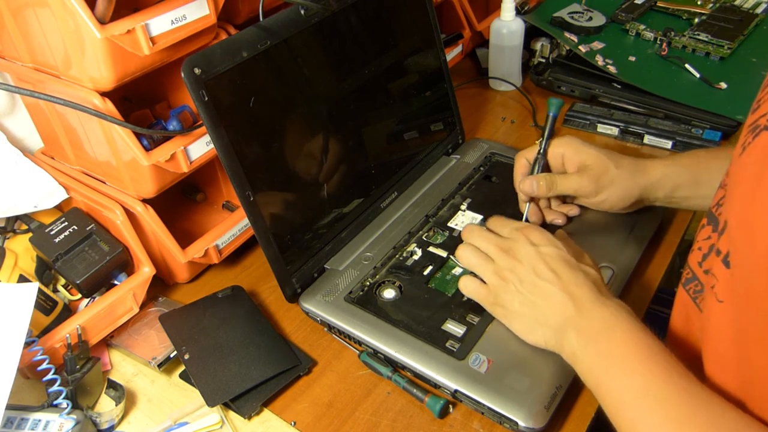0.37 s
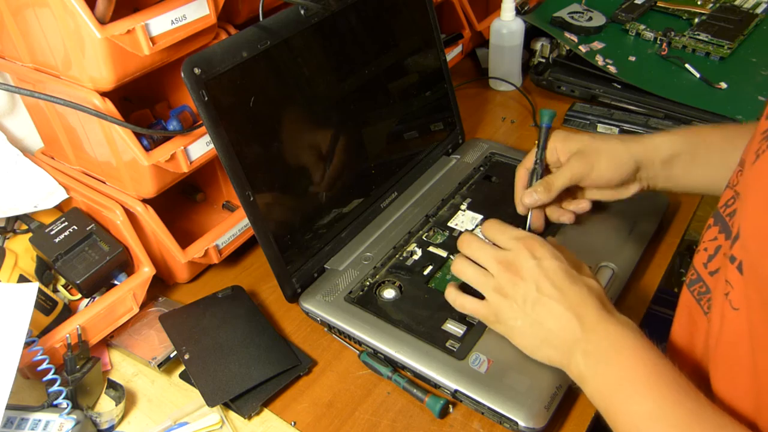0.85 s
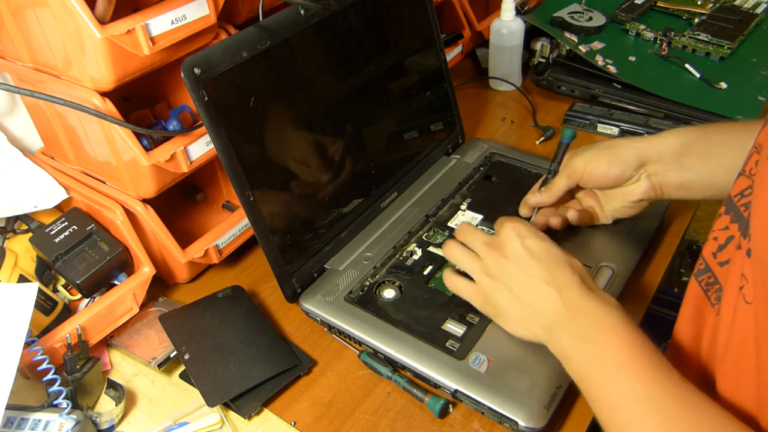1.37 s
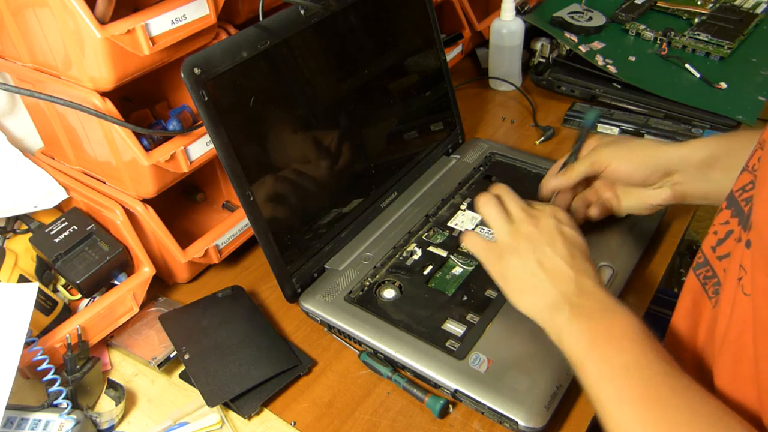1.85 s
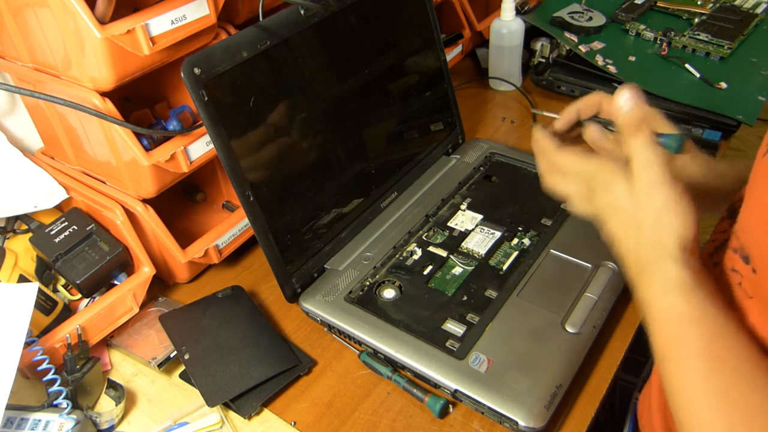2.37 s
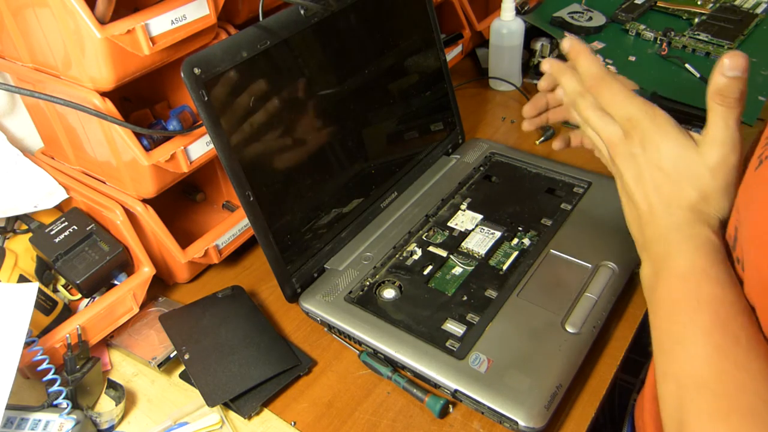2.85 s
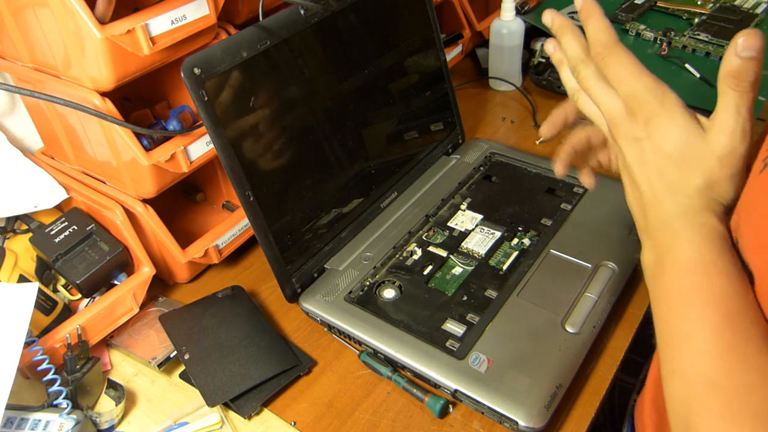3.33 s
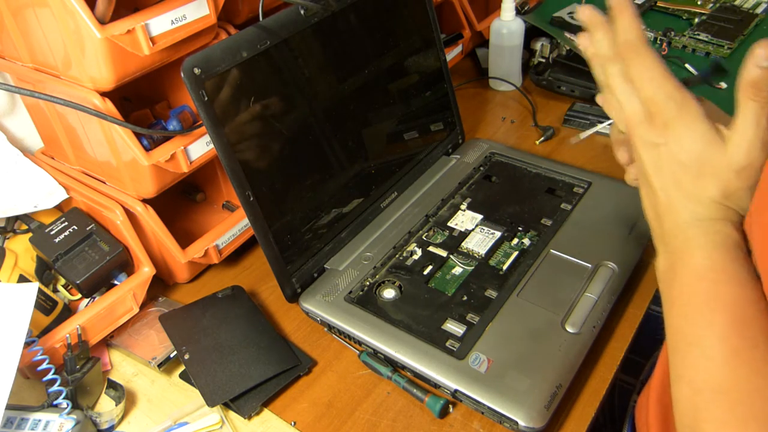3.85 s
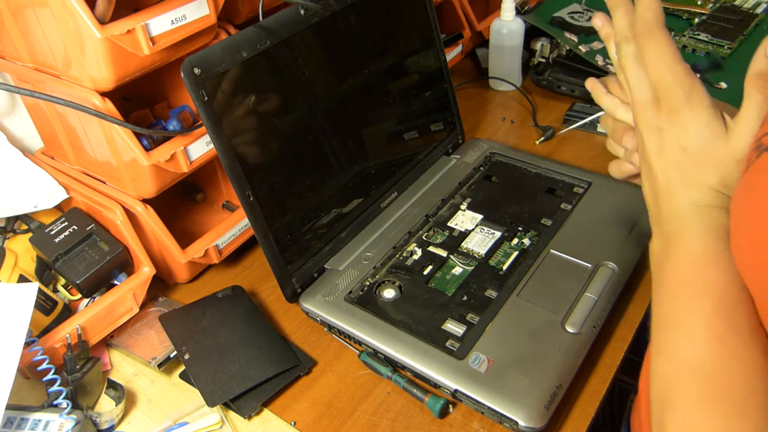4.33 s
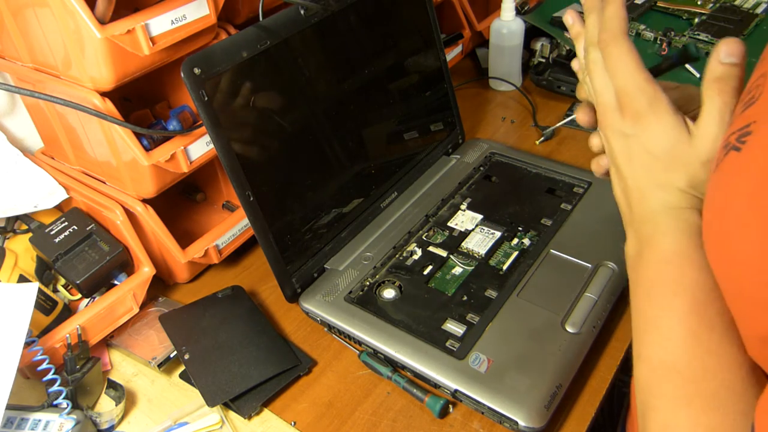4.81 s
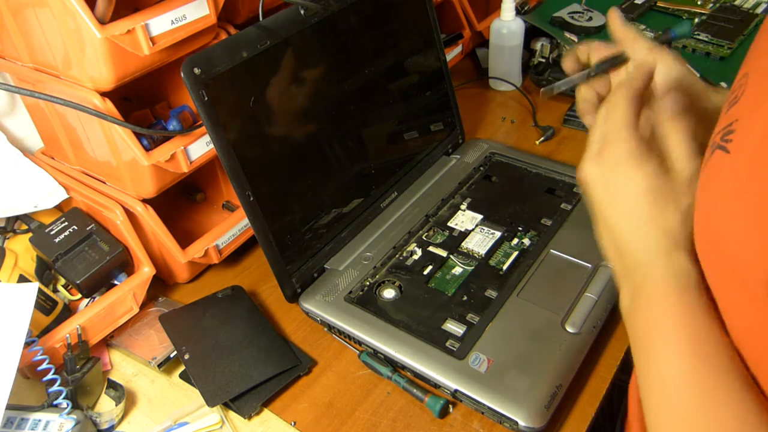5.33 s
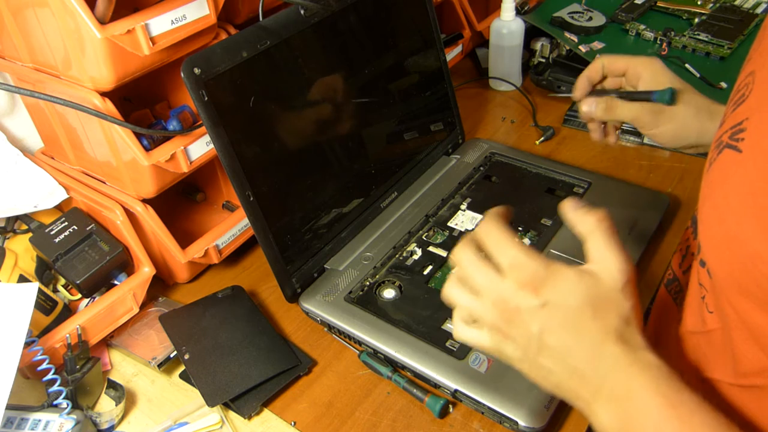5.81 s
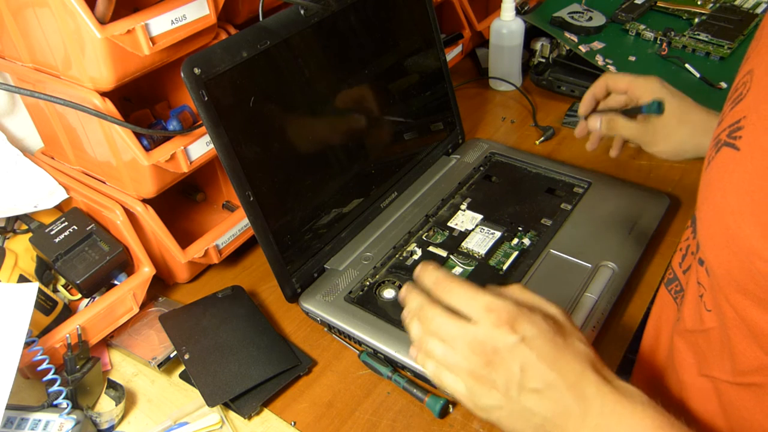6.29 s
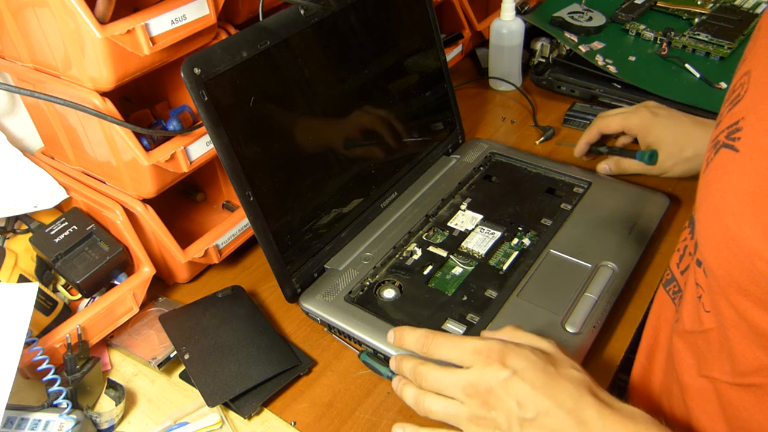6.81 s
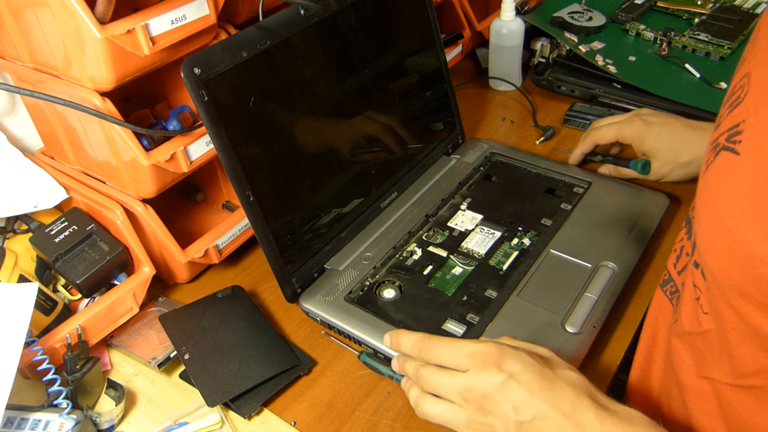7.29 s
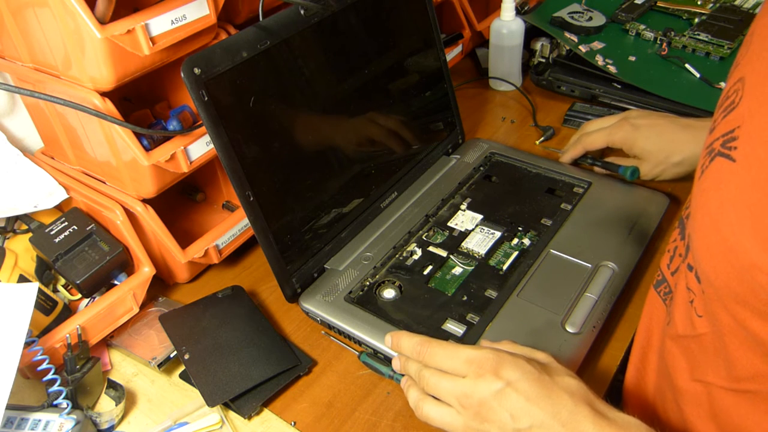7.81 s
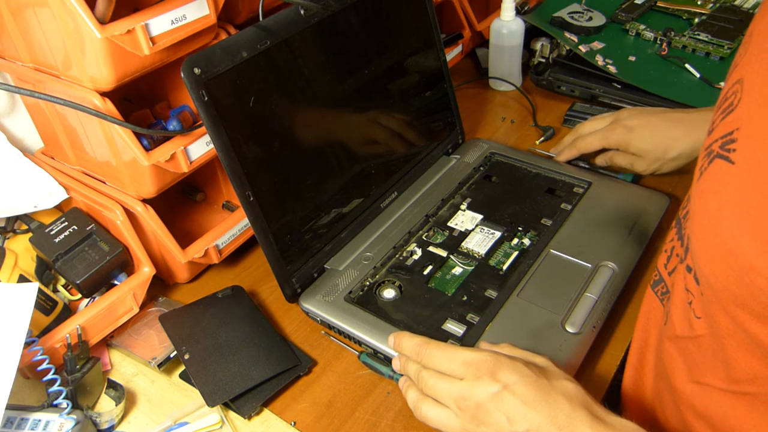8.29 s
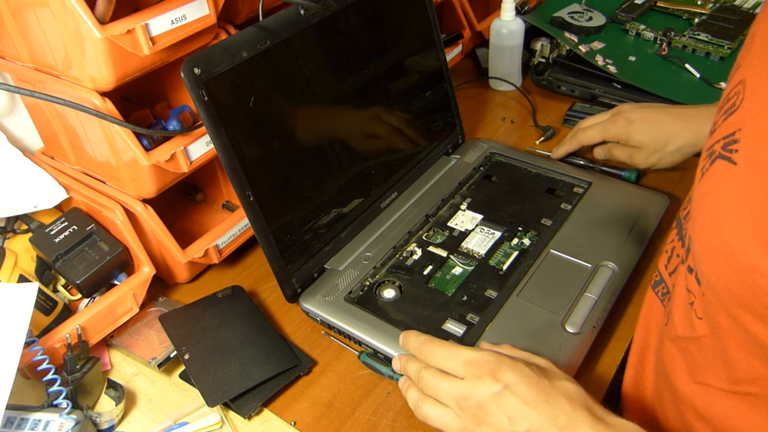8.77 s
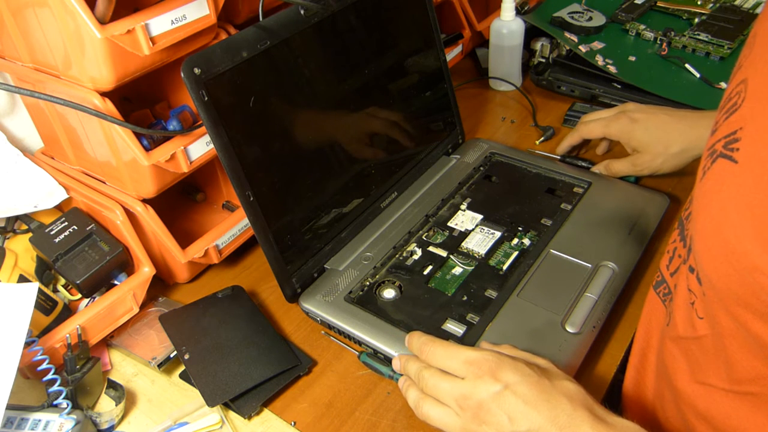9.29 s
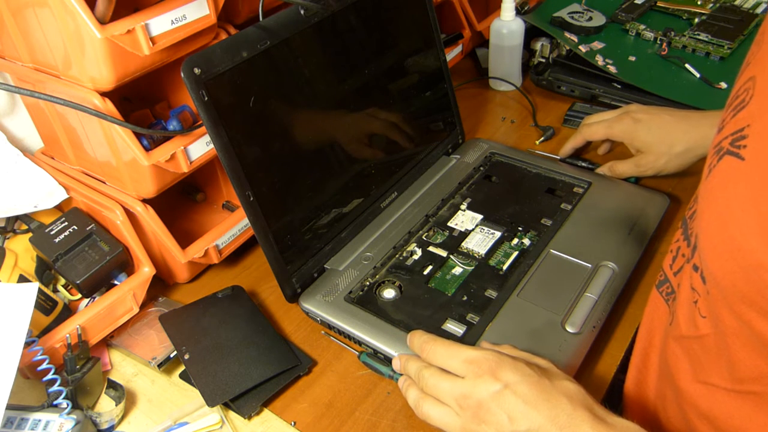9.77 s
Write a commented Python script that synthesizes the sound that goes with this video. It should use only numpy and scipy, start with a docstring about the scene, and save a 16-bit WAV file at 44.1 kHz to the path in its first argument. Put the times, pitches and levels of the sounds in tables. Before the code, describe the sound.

Small clacks, finger rubs and faint steel ticks of a screwdriver in an opened laptop, then one loud knock as the tool is put down.

```python
"""A quiet workshop: hands work with a small screwdriver in an opened laptop on a wooden bench.
Contacts and strong first echoes push damped resonances of small parts, plastic and hollow case; the bench rings.
Skin and sleeves are swelling noise; the steel shaft ticks and jingles. At last the tool is knocked down.
The wide stereo microphone hears the shop's echoes in noise bands, and adds hiss; the take is slightly off zero."""
import sys
import numpy as np
from scipy import signal
from scipy.fft import rfft, irfft, next_fast_len
from scipy.io import wavfile
from scipy.ndimage import uniform_filter1d

SR = 44100
rng = np.random.default_rng(int(sys.argv[2]) if len(sys.argv) > 2 else 0)


def dump(signal):
    """Clip the signal to [-1, 1] and save it as 16-bit WAV at the path in sys.argv[1]."""
    limited = np.clip(np.atleast_2d(signal).T, -1, 1)
    pcm = np.round(limited * 32767).astype(np.int16)
    wavfile.write(sys.argv[1], SR, pcm)


def how_loud(loudness_db):
    """Turn decibels into a plain amplitude multiplier (0 dB gives 1, 20 dB gives 10)."""
    steps = np.asarray(loudness_db, float) / 20
    return 10 ** steps


N = 436149   # samples

# resonances of the steel tool: centre_hz, width_hz (of one pass), level_db (relative)
TOOL_PEAKS = [(3900, 200, 1), (4170, 150, 3), (1900, 500, 0), (2300, 500, 0), (3050, 450, 0),
              (4850, 600, 0), (5450, 260, 0), (6100, 800, 0), (8400, 700, 0)]


def rms_one(x):
    """Scales a signal to an rms of one."""
    return x / np.sqrt(np.mean(x ** 2) + 1e-20)


def at_hz(points, hz):
    """Reads a curve of (Hz, value) points, straight over log frequency."""
    point_hz, value = np.transpose(points)
    return np.interp(np.log(hz), np.log(point_hz), value)


def pair(mid, side, alike):
    """Left and right from two unrelated signals with the given likeness (correlation)."""
    alike = np.clip(alike, -1, 1)
    common = np.sqrt(1 + alike) * mid
    apart = np.sqrt(1 - alike) * side
    return np.array([common + apart, common - apart]) / np.sqrt(2)


def coloured(spectrum, likeness):
    """Stereo noise with a spectrum and a likeness by frequency; rms 1."""
    size = next_fast_len(N)
    hz = np.maximum(np.arange(size // 2 + 1) * SR / size, 1)
    mid, side = rfft(rng.standard_normal((2, size)))
    tones = pair(mid, side, at_hz(likeness, hz)) * how_loud(at_hz(spectrum, hz))
    return rms_one(irfft(tones, size)[:, :N])


def swells(rows):
    """Each stroke swells to its peak and fades; their powers add."""
    edge_db, curve = -13.5, 1.37   # level at the end of swell and fade; 1 pointed, 2 round
    t = np.arange(0, N / SR + 0.002, 0.001)
    power = 0
    for s, peak_db, swell, fade in rows:
        away = np.where(t < s, (s - t) / swell, (t - s) / fade)
        power = power + how_loud(peak_db + edge_db * np.minimum(away, 8) ** curve) ** 2
    return np.interp(np.arange(N) / SR, t, np.sqrt(power))


def force(times, level_db, length_ms):
    """Rattling pushes that start at once and die, their energy levelled over all pitches."""
    out = np.full(N, 1e-18)   # a tiny floor keeps the filters out of denormal numbers
    t_ms = np.arange(4096) * 1000 / SR
    for s, gain, ms in zip(times, how_loud(level_db), np.clip(length_ms, 0.2, 30)):
        rattle = rng.standard_normal(4096)
        for _ in range(2):
            tones = rfft(rattle * np.exp(-t_ms / (1.49 * ms)))
            rattle = irfft(tones / np.abs(tones))   # level the spectrum, keep the timing
        push = rms_one(rattle * np.exp(-t_ms / (5.0 * ms))) / np.sqrt(4096)   # unit energy
        i = round(s * SR)
        out[i:i + 4096] += gain * push
    return out


def resound(push, peaks):
    """Heavily damped parts colour a push; each resonance acts twice for steep flanks."""
    out = 0
    for k, (hz, width_hz, level_db) in enumerate(peaks):
        r, w = np.exp(-np.pi * width_hz / SR), 2 * np.pi * hz / SR
        section = [(1 - r * r) / 2, 0, (r * r - 1) / 2, 1, -2 * r * np.cos(w), r * r]
        sign = (-1) ** k   # neighbours in opposite phase
        out = out + sign * how_loud(level_db) * signal.sosfilt([section, section], push)
    return out


def ring(push, mode):
    """A mode answers a push with a decaying sine."""
    hz, level_db, t60 = mode
    r, w = how_loud(-60 / (t60 * SR)), 2 * np.pi * hz / SR
    return signal.lfilter([0, how_loud(level_db) * np.sin(w)], [1, -2 * r * np.cos(w), r * r], push)


def background():
    """Steady stereo noise, the hiss of the microphone, shaped in level and likeness by frequency."""
    # spectrum: freq_hz, level_db (relative, per Hz)
    air_spectrum = [(15, -34.5), (25, -5), (33, -21), (113, -12.5), (178, -13), (209, -6.5), (240, -7.5),
                    (349, -6), (582, -6.5), (782, -9), (1110, -11.5), (1200, -13.5), (3440, -23.5),
                    (5010, -22), (15500, -31.5)]
    # left against right: freq_hz, likeness (-1 to 1)
    air_likeness = [(60, 1), (150, 0.2), (380, -0.84), (950, -0.52), (2380, -0.2), (5980, 0.032),
                    (15000, 0.4)]
    return how_loud(-60) * coloured(air_spectrum, air_likeness)


def rubbing():
    """Bright hiss of skin and cloth, duller scrape on the case, each noise following the strokes."""
    # strokes of skin and cloth: peak_s, peak_db, swell_s, fade_s
    stroke_rows = [(0.03, -64, 0.075, 0.1), (0.55, -59, 0.17, 0.11), (0.812, -47.5, 0.02, 0.05),
                   (0.89, -54.5, 0.1, 0.13), (1.09, -60, 0.086, 0.074), (1.37, -54, 0.14, 0.18),
                   (1.57, -60, 0.092, 0.13), (1.88, -63, .08, 0.17), (2.27, -60, 0.16, 0.28),
                   (2.5, -57, 0.086, 0.13), (2.7, -51.5, 0.073, 0.067), (2.82, -56.5, 0.057, 0.087),
                   (3.02, -57.5, 0.086, 0.15), (3.18, -51.5, 0.065, 0.064), (3.25, -59.5, .07, 0.19),
                   (3.52, -60.5, 0.1, 0.21), (3.89, -63.5, 0.079, 0.064), (4.045, -56, 0.055, 0.094),
                   (4.27, -62.5, 0.064, 0.11), (4.45, -65, 0.18, 0.16), (4.6, -62, 0.056, 0.073),
                   (4.705, -57.5, 0.094, 0.079), (4.99, -58.5, 0.11, 0.046), (5.19, -57, 0.17, 0.22),
                   (5.43, -62.5, 0.13, 0.1), (5.58, -58, 0.25, 0.33), (5.85, -68, 0.033, .14)]
    # fingers dragging across the case: peak_s, peak_db, swell_s, fade_s
    drag_rows = [(0.83, -52, 0.056, 0.29), (1.06, -54, 0.014, 0.023), (1.25, -60.5, 0.036, 0.083),
                 (1.41, -60, 0.17, 0.41), (1.85, -49.5, 0.082, 0.037), (5.06, -56, .03, 0.055),
                 (5.58, -67, 0.21, .15)]
    # spectra of cloth hiss, case scrape and bright sheen: freq_hz, level_db (relative, per Hz)
    hiss_spectrum = [(880, -19), (1500, -19), (1880, -4), (2300, -4), (2590, -5), (3810, -3.5),
                     (4080, -0.5), (8660, 5), (11000, -4), (14600, -20), (16000, -50)]
    scrape_spectrum = [(180, -49), (300, -15), (453, -54), (580, 7), (708, -6.5), (886, 2), (2020, -4.5),
                       (5000, -3.5), (6500, -32), (11000, -120)]
    sheen_spectrum = [(6000, -32), (9500, 4), (12500, -1), (15000, -13), (16000, -47)]
    # left against right: freq_hz, likeness (-1 to 1)
    rub_likeness = [(300, 0.34), (3000, 0.51), (8000, 0.5), (15000, 0.11)]
    strokes = swells(stroke_rows)
    # every stroke also scrapes a little, 12.5 dB down
    scrape = np.hypot(swells(drag_rows), how_loud(-12.5) * strokes)
    # firm strokes are brighter: the sheen grows with the square of the stroke
    bright = how_loud(37) * strokes ** 2 * coloured(sheen_spectrum, rub_likeness)
    hiss = strokes * coloured(hiss_spectrum, rub_likeness)
    return bright + hiss + scrape * coloured(scrape_spectrum, rub_likeness)


def contacts_and_first_echoes():
    """Touches, and strong first echoes of some, sound as small hard parts, plastic and hollow case together."""
    # touches, and the strong first echoes about 5 ms after some of them:
    # start_s, clack_db, tick_above_clack_db, knock_above_clack_db, length_ms (scales the decay)
    clack_rows = [(0.072, 4.5, -6, 4.5, 3.4), (0.0793, -5, -11, 6, 2.6), (0.149, -14, -7.5, -5, 3.8),
                  (0.235, -22.5, -14, 8, 5.8), (0.2807, -28, -10, 7, 2.5), (0.3157, -7, -2.5, 5.5, 4),
                  (0.416, -32, 8.5, -1, 4.9), (0.66, -28.5, 5, -7, 8.4), (0.6718, -6.5, -15.5, 8.5, 2.3),
                  (0.9317, -26.5, 8, -4, 5.2), (0.9584, -8, -0.5, -5, 1.2), (0.9627, -15, 3, 5.5, 2),
                  (1.0559, -19, -8, 4, 2.6), (1.131, -24, -3, 6, 5.3), (1.1411, -22.5, 7.5, 4.5, 2.2),
                  (1.147, -38, 11, -2, 1.5), (1.433, -15, -8, -2, 2), (1.4364, -4.5, -12.5, -2.5, 2.5),
                  (1.4707, -26.5, -11, 15.5, 2.3), (1.701, -28, 2.5, 8, 3), (1.77, -21, -1, -8, 11),
                  (1.784, -18, -4, 4, 5.1), (1.7891, -13, 3.5, 0, 2.5), (1.7958, -26, 6, 1, 1.5),
                  (1.824, -9.5, -9.5, -14, 2.5), (1.839, -20, -1.5, 1, 2), (1.9637, -16, -16, 8.5, 22),
                  (1.9882, 3.5, 1, -4, 2.5), (1.9932, 7, -2.5, -1.5, 2.6), (2.002, -10, -17, 6, 2.4),
                  (2.319, -27, 1, -30, 5.3), (2.3532, -23.5, 5, 0, 2.2), (2.634, -29, 6, 3, 5.1),
                  (2.969, -28, 2.5, -12, 3.5), (3.261, -23.5, -3, -6, 5), (3.303, -19.5, -4, -10.5, 4.9),
                  (3.36, -37, 15, 0.5, 0.89), (3.3865, -24, -1, 1, 1.3), (4.881, -20.5, -6, 7, 8),
                  (4.888, -14.5, -2.5, 5, 6.3), (4.8963, -12, -0.5, -1, 16), (5.033, -27, 0, -10, 4),
                  (5.0512, -18.5, -2.5, 3, 9), (5.132, -27, 3.5, -13.5, 2), (5.2555, -26.5, 0, -9, 1.5),
                  (5.3177, -22, -1.5, -6, 4), (5.332, -18.5, 2, -15.5, 6.3), (5.483, -18.5, 6, -13, 4.2),
                  (5.8187, -27.5, 9, -6, 5), (5.8984, -31, 3.5, -0.5, 2.2), (6.043, -28, -10, -4, 3.6),
                  (6.536, -41, 8.5, 7, 3.7), (7.131, -22.5, -20, 15, 7.7),
                  (7.1375, -19.5, -10.5, 12.5, 7.9), (7.4332, -19, -8, -1, 3.1),
                  (7.585, -25.5, 1, -3.5, 2.6), (7.868, -23.5, -0.5, 9.5, 3.8), (8.2206, 3, -8.5, 9.5, 5.4),
                  (8.2325, 18, -21, 5.5, 1.3), (8.2357, 8, -31.5, -6.5, 2.0)]
    # small hard parts, middle parts, plastic case, hollow case:
    # centre_hz, width_hz (of one pass), level_db (relative)
    tick_peaks = [(6800, 2100, -3.5), (8400, 2400, 0), (10000, 5500, -10.5), (12330, 1900, -15)]
    snap_peaks = [(3817, 850, 0.5), (5450, 2000, 0.04)]
    case_peaks = [(1736, 600, -1.5), (2400, 590, -3.5), (3050, 1004, -4.5)]
    hollow_peaks = [(695, 370, -9.5), (937, 235, -1), (1240, 990, -7.5)]
    s, clack_db, tick_db, knock_db, ms = np.transpose(clack_rows)
    snap_db = -1.03 + 0.64 * tick_db   # the middle parts take a share of the tick's excess
    parts = [(tick_db, tick_peaks), (snap_db, snap_peaks), (0, case_peaks), (knock_db, hollow_peaks)]
    return sum(resound(force(s, clack_db + above_db, ms), peaks) for above_db, peaks in parts)


def room(x):
    """Dense reflections: half-octave noise bands dying at their own rates, partly alike left and right."""
    # early decay by pitch: freq_hz, t60_s
    room_t60 = [(100, 0.21), (400, 0.3), (900, 0.23), (2000, 0.19), (5000, 0.27), (12000, 0.21)]
    # left against right: freq_hz, likeness (-1 to 1)
    room_likeness = [(100, 0.694), (400, 0.72), (1500, 0.28), (4000, 0.58), (10000, 0.23)]
    # slow tail from the far end of the shop: freq_hz, level_db (against the early decay)
    late_level = [(150, -46.5), (400, -41), (900, -24.5), (2000, -40), (5000, -46)]
    late_t60_s, lump_db, lumps_per_s = 1, -0.5, 51
    t = np.arange(SR // 2) / SR
    # the far tail comes back in uneven lumps
    lumps_db = lump_db * np.interp(t * lumps_per_s, np.arange(64), rng.standard_normal(64))
    tail = 0
    for low in 120 * 2 ** np.arange(0, 7, 0.5):
        half_octave = signal.butter(2, [low, np.sqrt(2) * low], "band", fs=SR, output="sos")
        band = signal.sosfilt(half_octave, rng.standard_normal((2, SR // 2)))
        hz = low * 2 ** (1 / 4)
        early = how_loud(-60 * t / at_hz(room_t60, hz))
        late = how_loud(at_hz(late_level, hz) + lumps_db - 60 * t / late_t60_s)
        tail = tail + pair(*band, at_hz(room_likeness, hz)) * (early + late)
    tones = rfft(tail, SR)   # bins of 1 Hz
    # no broad region of pitch is favoured: level over 300 bins
    usual_power = uniform_filter1d(np.abs(tones) ** 2, 300)
    tail = irfft(tones / np.sqrt(usual_power + 1e-9), SR)[:, :len(t)]
    tail = tail * (1 - np.exp(-t / 0.0025))   # echoes thicken over a few ms
    tail = tail / np.sqrt(np.sum(tail ** 2) / 2)
    return how_loud(1.6) * signal.fftconvolve(x[None], tail, axes=1)[:, :N]


def thumps():
    """Heavier touches reach the bench top, which swings slowly in its modes while the wood knocks dully."""
    # heavier touches: start_s, thump_db, wood_knock_db
    thump_rows = [(0.081, -48, -8), (0.317, -74, -17), (0.679, -65, -13.5), (0.962, -64.5, -17),
                  (1.438, -59.5, -23), (1.784, -61, -15), (1.99, -62.5, -16), (4.895, -84, -13.5),
                  (5.136, -69, -25), (7.139, -68.5, -6.5), (7.878, -65, -18), (8.23, -46, 8)]
    # modes of the bench top: freq_hz, level_db (relative), t60_s
    bench_modes = [(85, -10, 0.066), (125, -5, 0.16), (161, 4.5, 0.12), (201, 4.5, 0.095)]
    # dull knock of the wood: centre_hz, width_hz (of one pass), level_db (relative)
    wood_peaks = [(338, 120, 1), (503.6, 200, -2.7)]
    s, thump_db, wood_db = np.transpose(thump_rows)
    # each blow lands on another spot and favours other modes, 5 dB of spread
    spot_db = 5 * rng.standard_normal((len(s), len(bench_modes)))
    swing = 0
    for k, mode in enumerate(bench_modes):
        push = np.full(N, 1e-18)
        push[np.round(s * SR).astype(int)] = (-1) ** k * how_loud(thump_db + spot_db[:, k])
        swing = swing + ring(push, mode)
    knock_ms = np.full(len(s), 9.4)
    return swing + resound(force(s, wood_db, knock_ms), wood_peaks)


def steel_rings():
    """The steel rings briefly: the grip damps each resonance by its distance from the free pitch."""
    # rings of the steel tool, one of them a first echo: start_s, level_db, free_pitch_hz
    ring_rows = [(0.959, 3.5, 3050), (0.9588, -1, 6100), (0.958, -5, 8400), (0.9626, -8, 6100),
                 (2.214, -12.5, 4140), (2.317, -14, 3900), (2.3514, -12, 4170), (2.3518, -14, 8400),
                 (2.3627, -12.5, 8400), (2.633, -18, 4170), (2.642, -14, 5450), (2.9692, -19, 4060),
                 (3.3877, -12, 8400), (3.386, -13, 5450), (3.387, -12, 3970), (3.3875, -9, 2100),
                 (3.417, -17, 4000), (3.424, -16, 5450), (3.46, -18, 4030), (3.508, -17.5, 4030),
                 (3.545, -19, 3960), (3.587, -16, 3960), (3.621, -14.5, 3920), (4.972, -12, 4080),
                 (5.03, -11, 4100), (5.116, -18, 2330), (5.117, -16, 4030), (5.1317, -25, 2320),
                 (5.137, -13, 4000), (5.2555, -18, 2300), (5.32, -11, 8400), (5.3207, -9, 5450),
                 (5.3384, -8, 5450), (5.3377, -4.5, 8400), (5.4812, -5, 2400), (5.483, -5.5, 3960),
                 (5.4808, -11, 5450), (5.482, -1.5, 8400), (5.8213, -11, 5450), (5.821, -16, 4170),
                 (5.898, -17, 8400), (7.1388, -9.5, 4850), (7.5848, -8, 4730), (8.2206, 5.5, 5450),
                 (8.221, 14.5, 2000)]
    grip_db_per_octave = -90.5
    s, level_db, free_hz = np.transpose(ring_rows)
    push_ms = np.full(len(s), 0.52)
    out = 0
    for peak in TOOL_PEAKS:
        octaves_away = np.abs(np.log2(peak[0] / free_hz))
        push = force(s, level_db + grip_db_per_octave * octaves_away, push_ms)
        out = out + resound(push, [peak])
    return out


def jingle():
    """The tool jingles loosely while carried: tiny random ticks excite two of its resonances."""
    # spells of carrying: start_s, end_s, level_db
    carried = [(3.4, 3.663, -46), (4.96, 5.08, -41)]
    ticks_per_s = 70
    t = np.arange(N) / SR
    ticks = (rng.random(N) < ticks_per_s / SR) * rng.standard_normal(N)
    loose = sum(how_loud(level_db) * (t > start) * (t < end) for start, end, level_db in carried)
    return resound(ticks * loose + 1e-18, TOOL_PEAKS[:2])


def scene():
    """Work at the bench and its echoes, a little louder on the left, with rubbing and background."""
    knocks = contacts_and_first_echoes() + thumps()
    steel = steel_rings() + jingle()
    # the tool, held close to the microphone, reaches the room 3.5 dB less
    echoes = room(knocks + how_loud(-3.5) * steel)
    balance = how_loud(np.array([[0.84], [-0.84]]))   # dB, left and right
    return (knocks + steel + echoes) * balance + rubbing() + background()


def band_limit(x):
    """A steep low-pass at the top of the band."""
    return signal.sosfilt(signal.butter(12, 16460, fs=SR, output="sos"), x)


def record(dry):
    """The top is cut, 60 dB down from 16 kHz, and the converter sits slightly off zero."""
    top_cut = signal.cheby2(16, 60, 16000, fs=SR, output="sos")
    mix = signal.sosfilt(top_cut, dry) - 0.0029
    return band_limit(mix)


dry = scene()
out = record(dry)
dump(out)
```